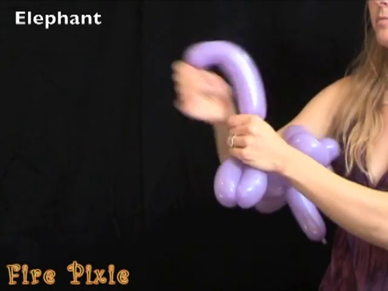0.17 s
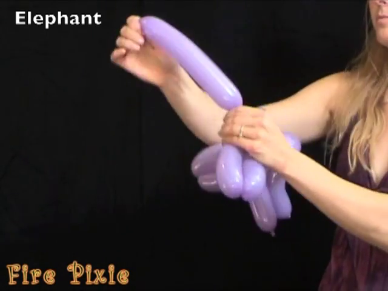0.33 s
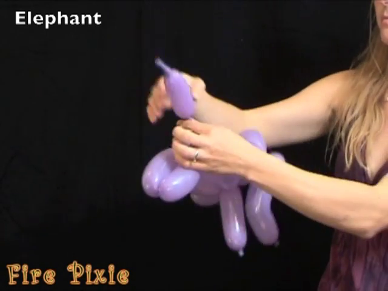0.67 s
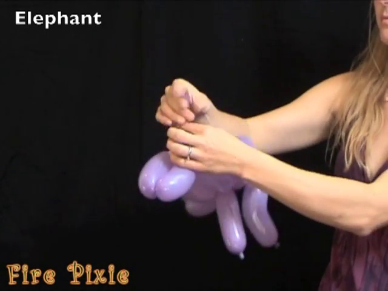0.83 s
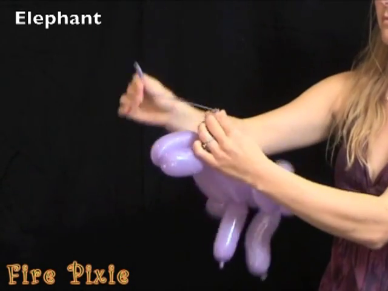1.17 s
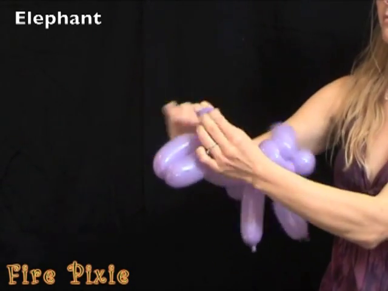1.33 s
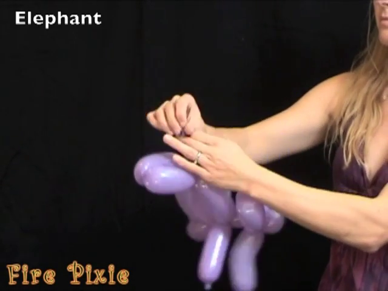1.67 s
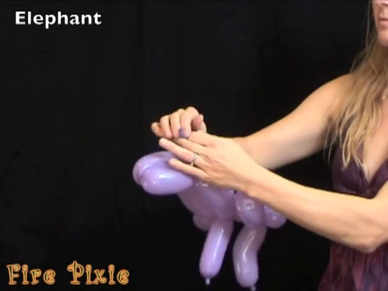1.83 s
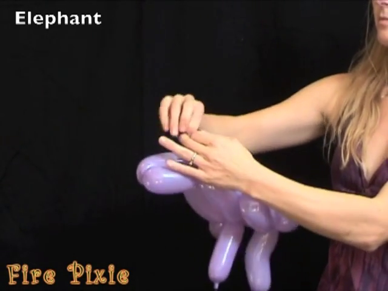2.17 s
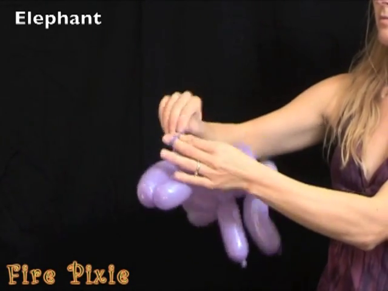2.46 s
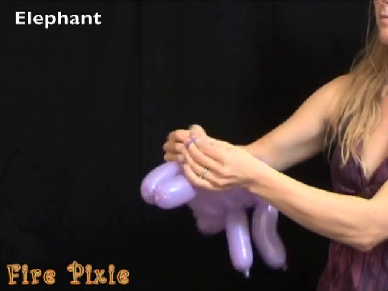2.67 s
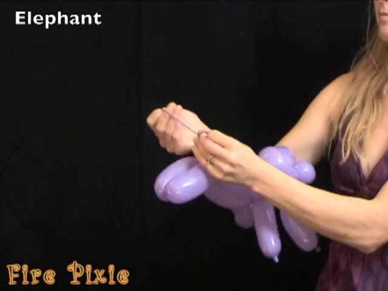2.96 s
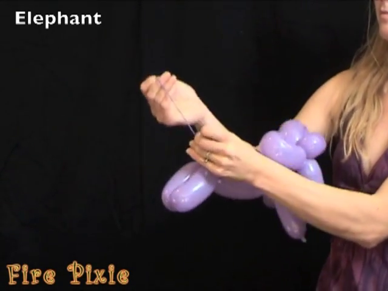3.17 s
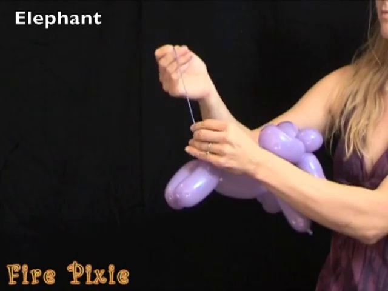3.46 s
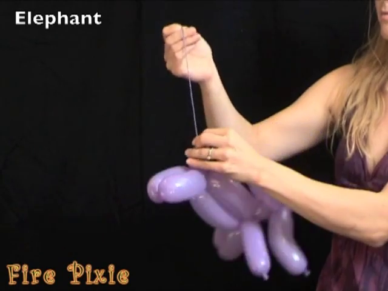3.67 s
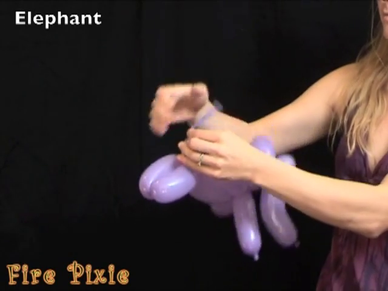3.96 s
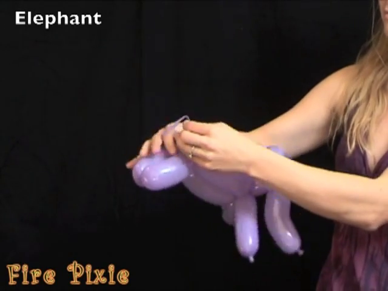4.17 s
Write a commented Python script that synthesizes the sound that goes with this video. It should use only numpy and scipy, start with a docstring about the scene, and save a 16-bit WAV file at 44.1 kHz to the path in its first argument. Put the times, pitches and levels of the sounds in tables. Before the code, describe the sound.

Close rubber snaps and soft hollow thuds, a short air burst with a squeal turning up at its end, then sparse crackling handling.

```python
"""Hands work a long latex balloon in a small bare room, close to a narrow stereo microphone.
Taut rubber slips and snaps, ringing skin and edge; bumped or dragged air chambers thud and groan.
One end tears: filtered noise rushes out and the torn neck flaps, partials in a squeak that falls,
then turns up as it ends. Fingers rub in tiny random slips. A faint hum and dull rumble lie below.
Decaying noise answers as the room, wider than the sources, which stand in the middle."""
import sys
import numpy as np
from scipy import signal
from scipy.io import wavfile

SR = 44100
rng = np.random.default_rng(int(sys.argv[2]) if len(sys.argv) > 2 else 0)


def invert_db(x):
    """Field ratio 10**(x/20) for x, a level in decibels (scalar or array-like)."""
    u = np.asarray(x, float) / 20
    return 10 ** u


def output_pcm(signal):
    """Save a mono or channel-first signal as 16-bit PCM at the path in sys.argv[1].

    Samples are clipped to [-1, 1] before scaling.
    """
    pcm = np.clip(np.atleast_2d(signal).T, -1, 1) * 32767
    wavfile.write(sys.argv[1], SR, np.round(pcm).astype(np.int16))


N = 189718
LEAD = 4410   # samples ahead of the start, heard only by their reverberation
TOTAL = N + LEAD


def rms_one(x):
    """Scale to rms 1."""
    return x / np.sqrt(np.mean(x ** 2) + 1e-20)


def seconds():
    """Time of every sample, negative in the lead-in."""
    return (np.arange(TOTAL) - LEAD) / SR


def in_time(rows):
    """Columns of a curve, sample by sample, lead-in included."""
    s, *columns = np.transpose(rows)
    return [np.interp(seconds(), s, column) for column in columns]


def at_hz(points, hz):
    """Level in dB of a spectrum at hz, read along log frequency."""
    point_hz, point_db = np.transpose(points)
    return np.interp(np.log(hz), np.log(point_hz), point_db)


def drift(rate_hz):
    """Slow random wander of spread 1: low-passed noise, drawn once every 40 samples."""
    r = np.exp(-80 * np.pi * rate_hz / SR)
    noise = rng.standard_normal(N // 40 + 2200)
    slow = signal.lfilter([1], [1, -2 * r, r * r], noise)[2000:]   # settled part
    return np.interp(np.arange(TOTAL) / 40, np.arange(len(slow)), rms_one(slow))


def resonate(x, modes):
    """Two-pole resonances in parallel, signs alternating."""
    out = 0
    for k, (hz, width_hz, level_db) in enumerate(modes):
        r = np.exp(-np.pi * width_hz / SR)
        poles = [1, -2 * r * np.cos(2 * np.pi * hz / SR), r * r]
        zeros = [(1 - r * r) / 2, 0, (r * r - 1) / 2]
        out = out + (-1) ** k * invert_db(level_db) * signal.lfilter(zeros, poles, x + 1e-18)
    return out


def struck(clicks, modes):
    """Resonances scaled so that a unit click rings up to a peak of 1."""
    click_peak = np.abs(resonate(signal.unit_impulse(shape=200), modes)).max()
    return resonate(clicks, modes) / click_peak


def band(x, low_hz, high_hz):
    """Second-order band-pass."""
    return signal.sosfilt(signal.butter(2, [low_hz, high_hz], "band", fs=SR, output="sos"), x)


# Rubber letting go close by; the last two rows are bounces of the snap at 4.2058 s, 13 ms apart. Each row: time
# in seconds, knock of the skin in dB, crack of the edge in dB, length of the slip in ms. The levels are those
# before slips over 5.3 ms are softened.
SLIPS = [(-0.04, -8, -6.5, 5.6), (0.2506, -40, -32, 3.4), (0.2958, -30, -29.5, 10.3),
         (0.3184, -20, -57, 0.67), (0.354, -55, -32, 1.5), (0.3794, -58, -31, 2.0),
         (0.4118, -40, -25, 0.77), (0.4184, -28, -14, 2.2), (0.4274, -25, -21, 12), (0.4397, -4.5, -1, 3.8),
         (0.4435, -14, -4.5, 13), (0.6788, -16.5, -12, 1.3), (0.682, -8, -7, 1.16),
         (0.6986, -17, -9.5, 2.1), (0.7803, -25, -36, 12), (0.7927, -10.5, -9, 8.2),
         (1.2768, -25.5, -22, 1.4), (1.5117, -43, -37.5, 2.35), (1.54, -31, -21.5, 1.4),
         (1.5637, -36, -31, 3.7), (1.603, -9.5, -8.5, 2.1), (1.6392, -12, -5, 1.7),
         (1.7013, -44, -17.5, 1.8), (1.7115, -30, -16, 1.3), (1.7162, -29, -18, 1.4),
         (1.721, -27, -23, 2.4), (1.7861, -30, -39, 5.9), (1.8148, -29, -51, 0.87), (1.839, -45, -31, 1.5),
         (1.8477, -32.5, -23.5, 3.3), (1.8724, -22.5, -10.5, 3.9), (1.9035, -29.5, -21.5, 3.1),
         (1.9989, -33, -27, 1.8), (2.0185, -37, -33, 3.3), (2.072, -39.5, -32.5, 6),
         (2.1191, -38.5, -40, 12), (2.1747, -34, -31, 1.5), (2.182, -32, -31, 2), (2.215, -38.5, -37, 7.6),
         (2.3271, -43.5, -39.5, 1.3), (2.423, -35.5, -44.5, 4.2), (2.439, -20.5, -11, 3.4),
         (2.4877, -33.5, -36, 2.7), (2.618, -61, -27, 0.6), (2.6304, -43, -38, 3.4),
         (2.648, -62, -31, 0.84), (2.7325, -27, -25, 6.3), (2.7632, -34, -30, 1.6),
         (2.8096, -32.5, -37, 9.1), (2.8235, -37, -30, 4.4), (2.844, -27.5, -21.5, 7.3),
         (2.8651, -18, -11, 3.3), (2.8968, -14, -2.5, 1.35), (2.9142, -25.5, -24, 1.6),
         (2.9861, -37, -30.5, 2.9), (3.0398, -33, -57.5, 1.4), (3.211, -48, -27, 2.7),
         (3.2259, -43, -20.5, 1.5), (3.283, -25.5, -25.5, 3.9), (3.2913, -26, -22.5, 1.4),
         (3.391, -44, -39, 8.7), (3.4032, -37, -32, 2.9), (3.438, -37.5, -44.5, 3.9), (3.4591, -34, -11, 2),
         (3.4661, -30.5, -22, 4.1), (3.4872, -29.5, -23, 0.83), (3.5016, -36, -29, 2.6),
         (3.604, -43, -46, 1.8), (3.669, -50, -38.5, 1.8), (3.8188, -37.5, -41.5, 2.1),
         (3.845, -15, -31, 5.9), (3.8518, -20.5, -20.5, 10), (3.863, -24, -14.5, 4.5),
         (4.011, -54, -48, 1.1), (4.038, -10.5, -17, 3.1), (4.0509, -12, -19, 2), (4.0765, -11, -14.5, 2.4),
         (4.0895, -13.5, -17.5, 2.6), (4.1033, -18, -18.5, 2.8), (4.201, -25.5, -14, 2.9),
         (4.2058, -29, 8.5, 0.73), (4.2192, -37, -13, 1.5), (4.232, -62, -9, 1.8)]
# One twist chatters, five short slips at a steady beat.
# One row: knock in dB, crack in dB, length in ms.
CHATTER = (-19, -18, 1.12)
CHATTER_S, CHATTER_BEAT_S = 1.6768, .00198
# Resonances of the stretched skin and of the snapping edge.
# Each row: frequency in Hz, width in Hz, level in dB.
SKIN = [(680, 728, 2), (1700, 1150, 2.5), (3076, 1530, -2)]
EDGE = [(3684, 2120, 0), (6630, 4050, 3), (10480, 13000, -16.5)]


def slips(follow_db):
    """Each slip creeps, lets go sharply, and trails a swarm of smaller releases that dies over its length."""
    knocks, cracks = np.zeros((2, TOTAL + 1000))
    ms = (np.arange(1000) - 150) / SR * 1000   # the release is at sample 150
    creep = invert_db(-11.5 + 4.3 * ms)
    rows = SLIPS + [(CHATTER_S + k * CHATTER_BEAT_S, *CHATTER) for k in range(5)]
    for s, knock_db, crack_db, length_ms in rows:
        small, sparse = rng.standard_normal((2, 1000))
        trail = np.exp(-(ms / max(length_ms - .9, .1)) ** 2)
        swarm = invert_db(follow_db) * small * (sparse > .8) * np.where(ms < 0, creep, trail)
        swarm[150] = min(1, 5.3 / length_ms)   # long slips have a softer sharp release
        at = round(s * SR) + LEAD - 150
        knocks[at:at + 1000] += invert_db(knock_db) * swarm
        cracks[at:at + 1000] += invert_db(crack_db) * swarm
    return (struck(knocks, SKIN) + struck(cracks, EDGE))[:TOTAL]


# Air chambers bumped by the hands. Each row: time in seconds, level in dB, which chamber.
THUDS = [(.217, -37.5, "body"), (.297, -29.5, "long"), (.322, -33, "long"), (.391, -38, "body"),
         (.562, -32.5, "body"), (.679, -20, "body"), (0.7, -21.5, "bubble"), (.793, -20.5, "body"),
         (.811, -32.5, "body"), (1.536, -23, "ear"), (1.554, -31.5, "body"), (1.625, -32, "body"),
         (1.646, -26, "ear"), (1.677, -17, "bubble"), (1.68, -26, "body"), (1.788, -33, "body"),
         (1.845, -27, "leg"), (1.871, -28.5, "ear"), (2.81, -20.5, "long"), (2.822, -23, "body"),
         (2.836, -30, "body"), (2.856, -25.5, "long"), (3.31, -37, "body"), (4.203, -21.5, "leg")]
# The trapped air of each chamber, by name. Each entry: frequency in Hz, t60 in seconds.
CHAMBERS = {"long": (148, 0.059), "leg": (225, 0.02), "body": (282, .048), "ear": (368, 0.024),
            "bubble": (480, 0.039)}


def thuds():
    """A soft blow sets the trapped air of one chamber swinging for a few cycles."""
    out, t = np.zeros(TOTAL + 6000), np.arange(6000) / SR
    for s, level_db, chamber in THUDS:
        hz, t60 = CHAMBERS[chamber]
        onset = 1 - np.exp(-t / 0.0005)
        swing = np.sin(2 * np.pi * hz * t) * onset * invert_db(-60 * t / t60)
        at = round(s * SR) + LEAD
        out[at:at + 6000] += invert_db(level_db) * swing
    return out[:TOTAL]


# Air rushing through the tear: a burst, a thin leak under the squeak, a last puff as the neck closes.
TEAR_S, BURST_DB, BURST_HOLD_S, BURST_FALL_DB_PER_S = .794, -16.5, 0.02, 479
LEAK_DB, PUFF_S, PUFF_DB, PUFF_RISE_DB_PER_S = -51.5, 1.117, -39.5, 254.5
# Colour of the rushing air. Each row: frequency in Hz, width in Hz, level in dB.
RUSH_COLOUR = [(298, 360, -9), (1470, 3200, -7), (5930, 1450, 0), (10100, 5100, -10.5)]


def rush():
    """Turbulent air is filtered noise with a ragged level."""
    t = seconds()
    burst = invert_db(BURST_DB - BURST_FALL_DB_PER_S * np.maximum(t - TEAR_S - BURST_HOLD_S, 0))
    puff = invert_db(PUFF_DB - PUFF_RISE_DB_PER_S * np.abs(PUFF_S - t))
    flowing = np.clip(np.minimum(t - TEAR_S, PUFF_S - t) / .003 + 1, 0, 1)   # 3 ms ramps
    ragged = invert_db(3.0 * drift(180))
    level = flowing * (burst + invert_db(LEAK_DB) + puff) * ragged
    return level * rms_one(resonate(rng.standard_normal(TOTAL), RUSH_COLOUR))


# The torn neck flaps in pairs of beats. Each row: time in seconds, pairs per second,
# level of the low partials in dB, level of the high partials in dB.
SQUEAK = [(.836, 500, -25, -21), (.855, 513, -27.5, -17), (.91, 466, -33, -21), (.965, 443, -26.5, -23),
          (1.01, 430, -26, -26.5), (1.06, 429, -35, -19.5), (1.09, 436, -34, -19), (1.112, 468, -31, -16.5),
          (1.119, 484, -23, -13.5)]
# Spectra of the low and the high partials. Each row: frequency in Hz, level in dB on top of the above.
NECK_LOW = [(400, -11.5), (900, 2), (1750, -7.5), (2600, -5), (3200, -7), (4000, -34.5)]
NECK_HIGH = [(2400, -32), (3450, -12), (4300, -5), (5200, -1), (6000, -8.5), (7000, -8), (8000, -18),
             (10000, -27.5), (13000, -36), (16000, -46)]


def squeak(wobble_db, jitter):
    """Partials of the flapping; beats alike in a pair leave the odd partials weak."""
    start, end = (round(SQUEAK[k][0] * SR) + LEAD for k in (0, -1))
    part, length = slice(start, end), end - start
    pairs, low_db, high_db = (curve[part] for curve in in_time(SQUEAK))
    odd_db = np.linspace(-18.5, -11.5, length)   # beats of a pair grow less alike as the pressure falls
    turn = 2 * np.pi * np.cumsum(pairs * (1 + jitter * drift(200)[part])) / SR
    squeal = np.zeros(length)
    for k in range(1, 38):
        hz = k * pairs
        size = invert_db(low_db + at_hz(NECK_LOW, hz)) + invert_db(high_db + at_hz(NECK_HIGH, hz))
        wobble = wobble_db * np.clip(hz / 5000, 0, 1) * drift(28)[part]
        weak_odd = (k % 2) * odd_db * np.clip(1.3 - hz / 7000, 0, 1)   # less so higher up
        squeal += size * invert_db(wobble + weak_odd) * np.cos(k * turn + .05 * k * k)
    from_start = np.arange(length)
    out = np.zeros(TOTAL)
    out[part] = squeal * np.clip(np.minimum(from_start, from_start[::-1]) / 90, 0, 1)   # 2 ms fades
    return out


# Fingers rubbing on rubber. Each row: time in seconds, level in dB.
RUB = [(0, -46), (.2, -105), (.4, -51.5), (.66, -57), (.8, -52.5), (1.3, -57), (1.45, -65), (1.72, -50.5),
       (1.95, -62), (2.25, -58.5), (2.4, -73), (2.62, -65), (2.7, -60), (2.83, -46), (3.1, -64),
       (3.17, -59), (3.45, -65.5), (3.75, -71), (3.9, -69), (4.3, -88)]


def rub(per_s):
    """Tiny uneven slips, in crowds that thicken and thin, ring the same skin and edge."""
    level_db, = in_time(RUB)
    sizes = invert_db(6.9 * np.minimum(rng.exponential(1, TOTAL), 4)) * rng.choice([-1, 1], TOTAL)
    grains = sizes * (rng.random(TOTAL) < per_s * invert_db(5 * drift(20)) / SR)
    return invert_db(level_db) * rms_one(resonate(grains, EDGE) + invert_db(3.0) * resonate(grains, SKIN))


# A chamber dragged against another groans.
# Each row: start in seconds, length in seconds, level in dB, which chamber.
GROANS = [(.80, .07, -42, "long"), (3.39, .07, -47, "body"), (3.45, .13, -47, "long"),
          (3.465, .08, -45, "body"), (3.86, .12, -52, "long")]


def groans(width_hz):
    """Steady friction keeps the trapped air sounding, swelling and fading."""
    out, t = 0, seconds()
    for s, length_s, level_db, chamber in GROANS:
        hz, _ = CHAMBERS[chamber]
        air = resonate(rng.standard_normal(TOTAL), [(hz, width_hz, 0)])
        swell = np.sin(np.pi * np.clip((t - s) / length_s, 0, 1))
        out = out + invert_db(level_db) * swell * rms_one(air)
    return out


def room(x, count):
    """The hands keep moving, so each moment sounds from another spot; only the room differs left and right."""
    place = np.arange(TOTAL) / (.16 * SR)   # a new spot every 0.16 s, round and round
    out = 0
    for k in range(count):
        away = np.abs((place - k + count / 2) % count - count / 2)
        share = np.cos(np.pi / 2 * np.clip(away, 0, 1)) ** 2
        out = out + signal.fftconvolve((share * x)[None], room_reply(), axes=1)[:, :TOTAL]
    mid, side = out
    return np.array([mid + side, mid - side])


# Near surfaces. Each row: delay in ms, spread in ms, level in dB over the tail.
ECHOES = [(1.29, 0.96, 9.5), (4.33, 1.4, 10), (13.2, 1.1, -2), (18.24, 0.86, -2.5), (25, 0.97, -7)]
# Tail of the bare room. Each row: band centre in Hz, t60 in seconds, level in dB.
ROOM = [(152, 1, -11), (431.5, 0.31, -1.5), (1023, 0.52, -3.5), (2073, 0.42, -2.5), (4840, 0.41, -4),
        (7840, 0.3, -4.5), (12800, 0.43, -8)]


def room_reply():
    """Mid and side answer of the room from one spot: clustered near echoes, then a tail dying band by band."""
    t = np.arange(SR // 2) / SR
    reply = np.zeros((2, len(t)))
    for hz, t60, level_db in ROOM:
        noise = band(rng.standard_normal(reply.shape), hz / 1.35, min(hz * 1.563, 19000))
        # energy in step with the band's width, whatever its t60
        width_share = (min(hz * 1.5, 19000) - hz / 1.5) / (SR / 2)
        energy = np.sqrt(width_share / (t60 * SR / np.log(1e6)))
        reply += invert_db(level_db - 60 * t / t60) * energy * rms_one(noise)
    diffuse = 1 - 0.8 * np.exp(-t / 0.008)   # the tail needs time to fill
    near = sum(invert_db(level_db) * np.exp(-((1000 * t - ms) / spread_ms) ** 2)
               for ms, spread_ms, level_db in ECHOES)
    reply *= [diffuse + near, diffuse + .3 * near]
    reply = signal.lfilter([.6, .4], [1], reply)   # soft surfaces swallow the top
    # the side is quieter and thinner: a narrow stereo microphone
    reply[1] = invert_db(-13) * band(signal.lfilter([1, -.35], [1], reply[1]), 1400, 19000)
    return reply


# The hum wavers. Each row: time in seconds, level in dB.
HUM = [(0, -66.5), (.7, -65), (1.05, -76.5), (1.35, -67), (1.9, -59.5), (2.4, -62.5), (3.1, -64.5),
       (3.45, -60), (3.7, -67.5), (4.3, -69)]
HUM_HZ, RUMBLE_DB = 85.5, 5.5   # the rumble's level is beside the hum


def background():
    """A wavering low sine hum over dull rumble of low-passed noise."""
    level_db, = in_time(HUM)
    turn = 2 * np.pi * HUM_HZ * np.cumsum(1 + 0.0026 * drift(8.1)) / SR
    hum = invert_db(level_db + 0.75 * drift(5.8)) * np.sqrt(2) * np.sin(turn)
    rumble = rms_one(band(rng.standard_normal(TOTAL), 54, 380))
    return hum + invert_db(RUMBLE_DB + level_db + 3.2 * drift(4.0)) * rumble


def scene():
    """Everything the hands do sounds in the room; the hum is everywhere."""
    hands = slips(follow_db=-10.5) + thuds() + groans(width_hz=28.0) + rub(per_s=1800.0)
    jet = rush() + squeak(wobble_db=2.0, jitter=0.0014)
    # the jet points at the microphone, so the room answers it 2 dB less
    answer = room(hands + invert_db(-2) * jet, count=5)
    return (hands + jet + answer + background())[:, LEAD:]


def top_cut(x):
    """Nothing passes above the cut-off."""
    return signal.sosfilt(signal.butter(12, 16460, fs=SR, output="sos"), x)


def record(dry):
    """Peaks are rounded softly, then the top is cut steeply below 16.6 kHz."""
    rounded = 1.15 * np.tanh(dry / 1.15)
    mix = signal.sosfilt(signal.cheby2(12, 60, 16600, fs=SR, output="sos"), rounded)
    return top_cut(mix)


dry = scene()
out = record(dry)
output_pcm(out)
```